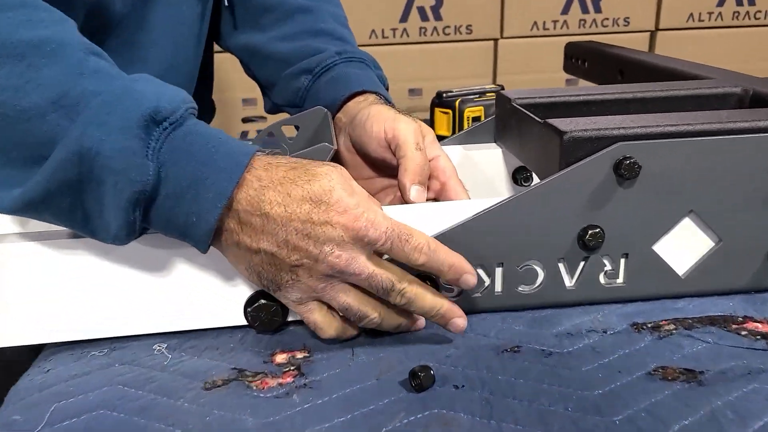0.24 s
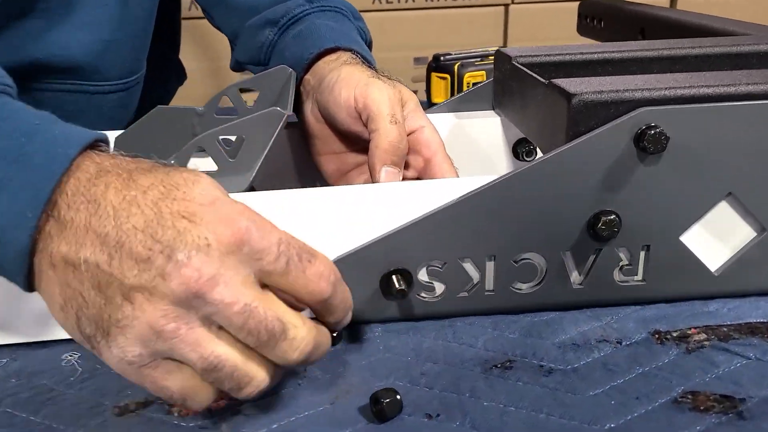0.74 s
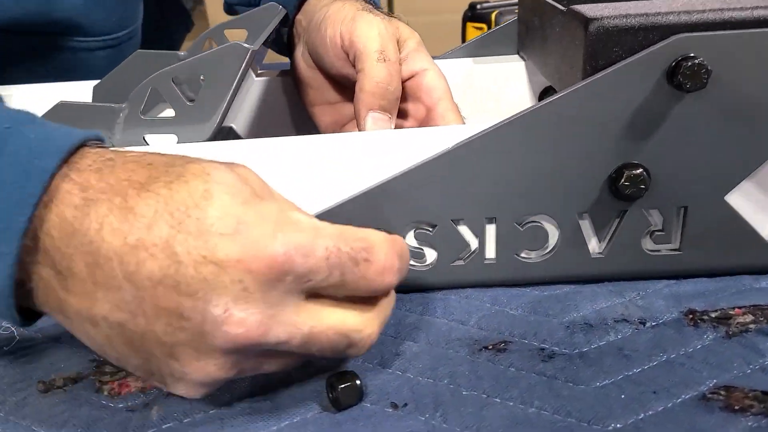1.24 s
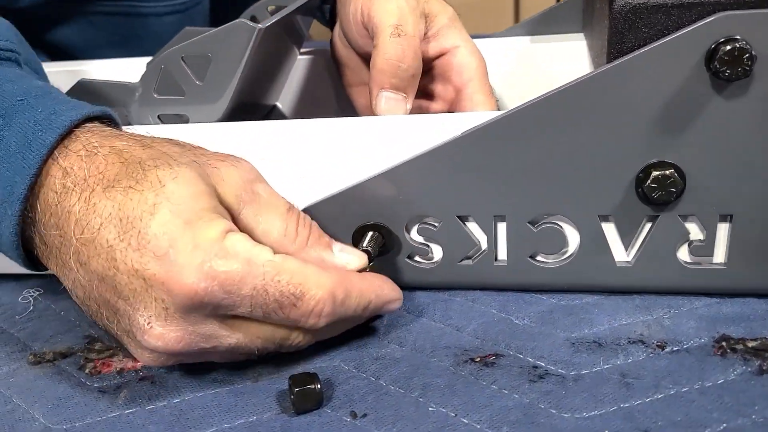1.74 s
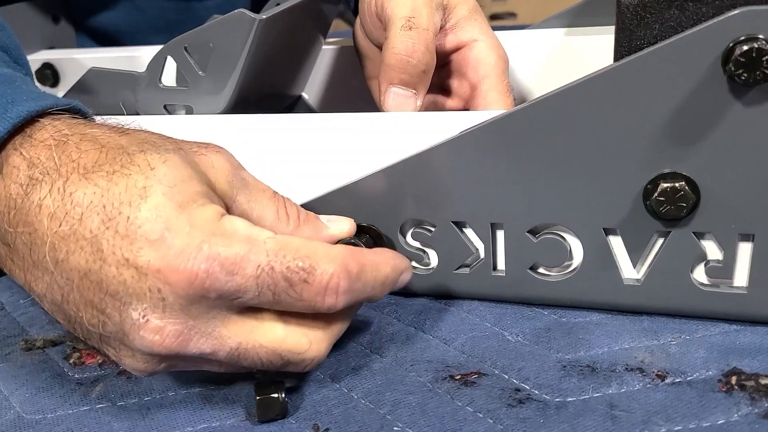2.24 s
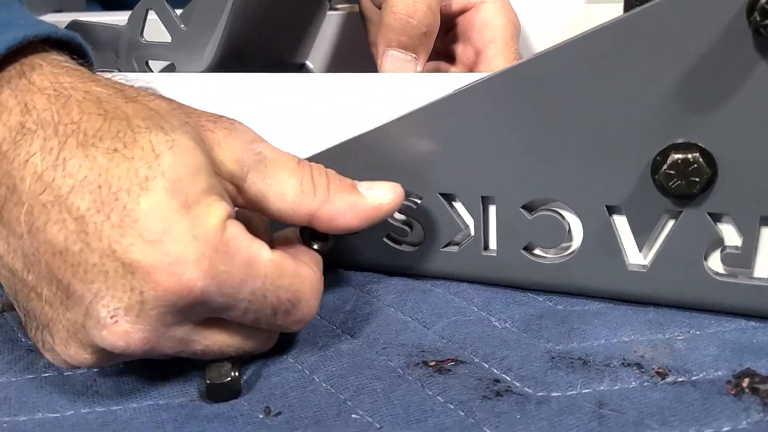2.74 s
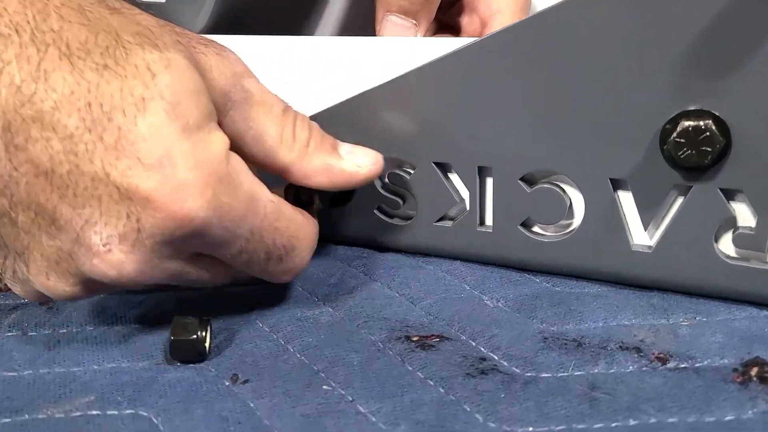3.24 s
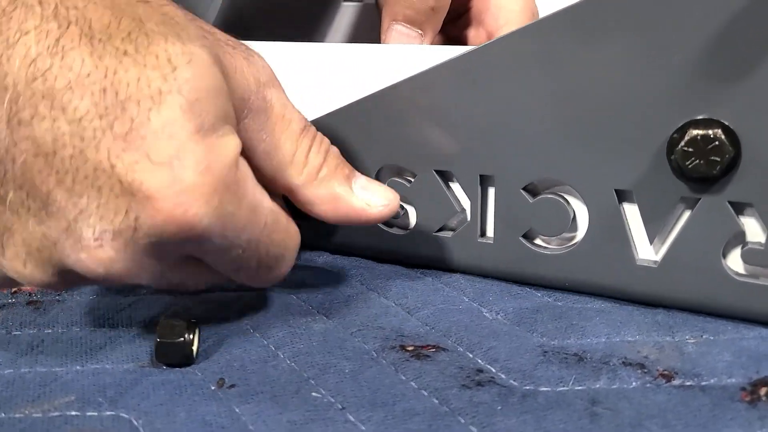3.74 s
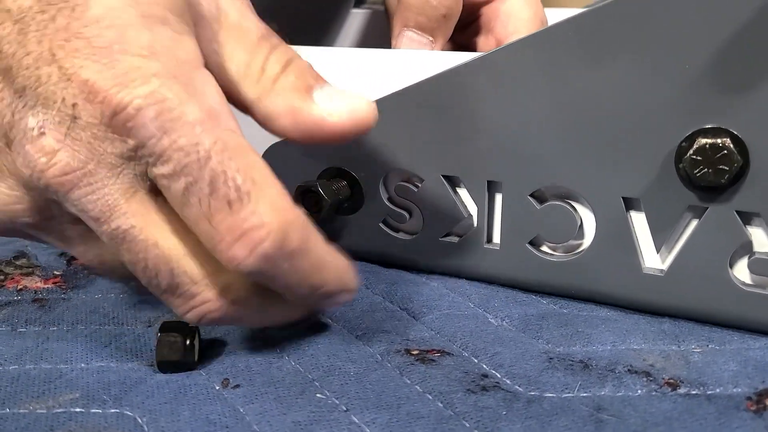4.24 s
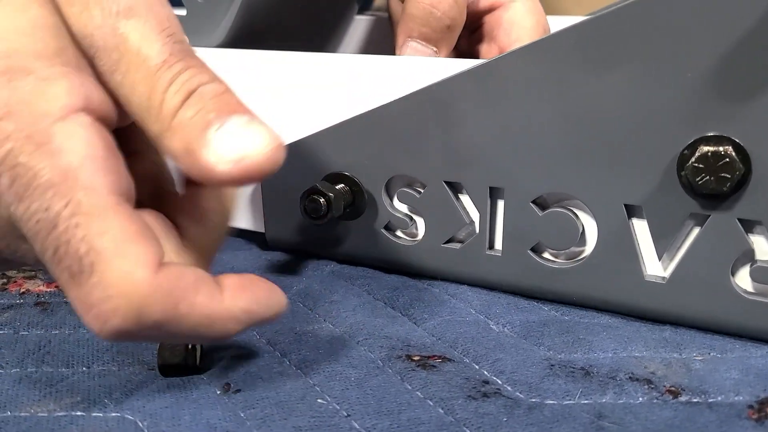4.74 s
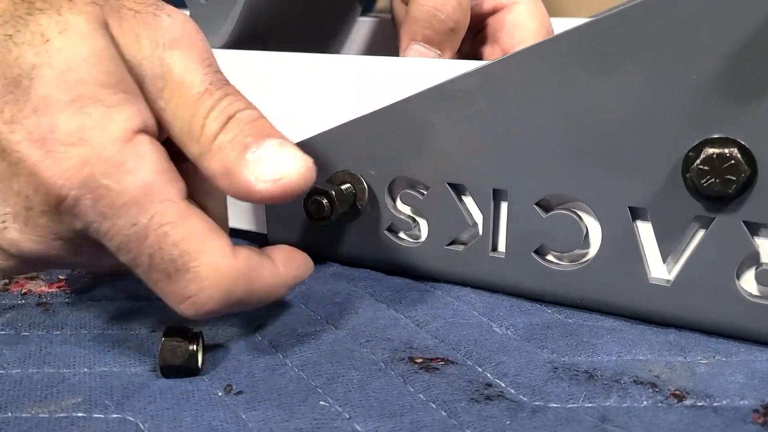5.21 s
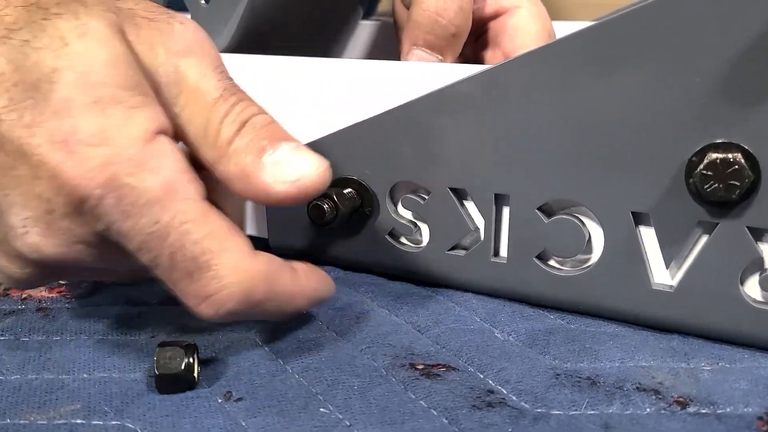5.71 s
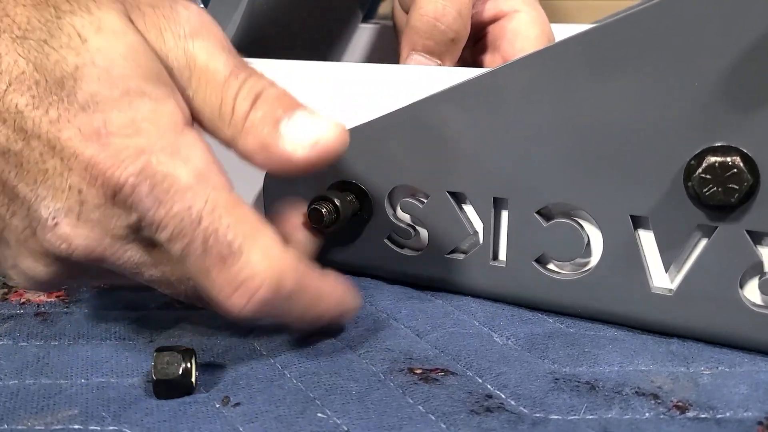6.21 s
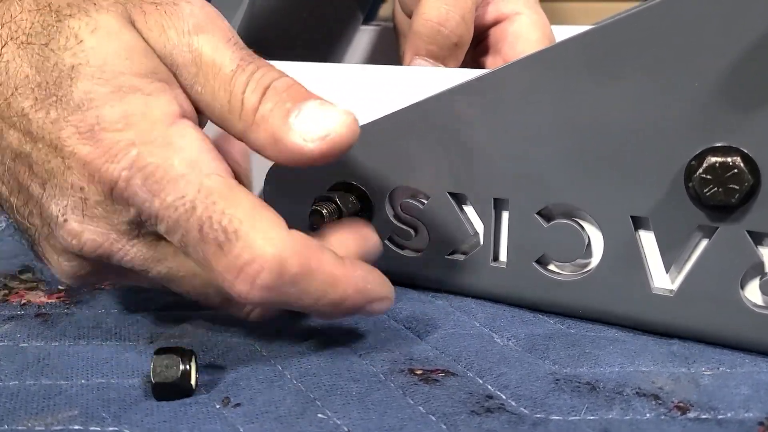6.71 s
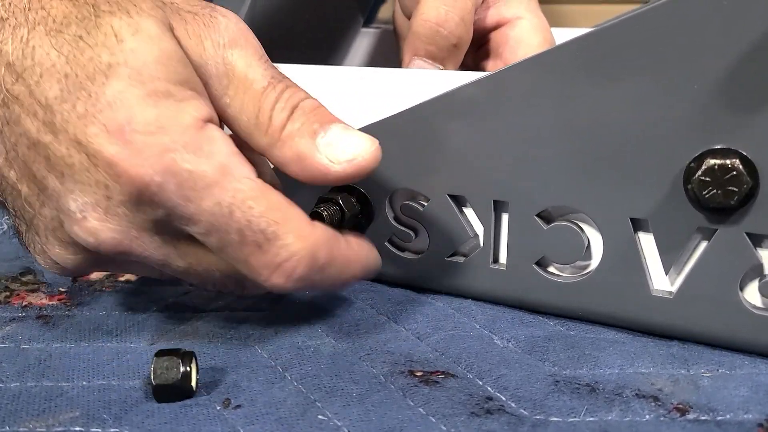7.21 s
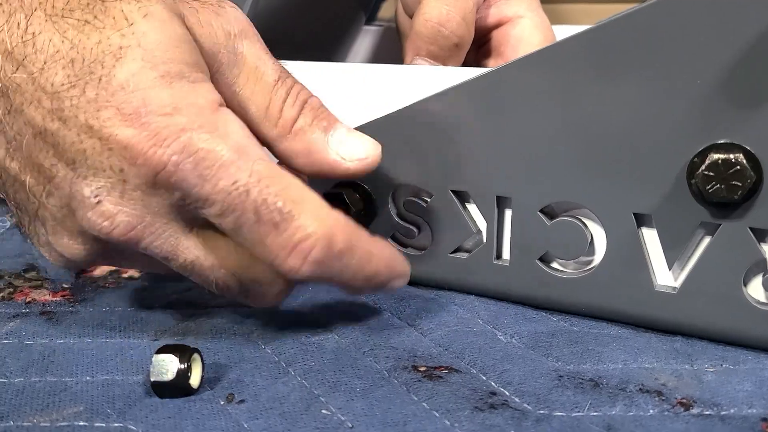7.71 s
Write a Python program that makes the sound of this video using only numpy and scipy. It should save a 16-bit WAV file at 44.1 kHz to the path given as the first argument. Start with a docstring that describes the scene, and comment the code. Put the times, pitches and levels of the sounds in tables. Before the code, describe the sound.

A quiet workshop with soft low ventilation rumble, faint mains hum and a trace of hiss, captured very close in stereo. From 0 to 0.7 s a washer slips over a steel bolt: small clinks, a bright one at 0.2 s with a thin high ping, a double clack at 0.4 s, a light slide around 0.6 s. Then near quiet, with a faint tap at 1.55 s. At 1.8 s the nut meets the thread with sharp clacks, then faint ticks and scrapes to 2.6 s. Looser strokes come at 2.9-4 s, with a dry snap at 3.4 s. From 4.3 to 7.1 s regular flicks, roughly every quarter second, each tick, brief swelling thread rattle and hard clack with a small bracket thump, strongest around 6-6.8 s. Washer pings ring at 5.2, 5.3 and 7.0 s. Softer strokes and dull hand bumps finish by 8 s, with short room reverberation.

```python
"""In a quiet workshop with a low mains hum, a washer is slipped over a bolt in a steel bracket,
then a nut is started and flicked along the thread with a finger, close to a two-port microphone.
Each flick is a tick, a swelling rattle of thread on thread and a clack as the nut stops; the loose washer pings.
Noise bursts stand for the contacts and ring the filters of bolt and bracket; pings and thumps are fading sines.
The air is shaped noise, and the room answers with fading noise."""
import sys
import numpy as np
from scipy import signal
from scipy.fft import rfft, irfft, next_fast_len
from scipy.io import wavfile
from scipy.ndimage import map_coordinates

SR = 44100
rng = np.random.default_rng(int(sys.argv[2]) if len(sys.argv) > 2 else 0)


def output_pcm(signal):
    """Save a mono or channel-first signal as 16-bit PCM at the path in sys.argv[1].

    Samples are clipped to [-1, 1] before scaling.
    """
    pcm = np.clip(np.atleast_2d(signal).T, -1, 1) * 32767
    wavfile.write(sys.argv[1], SR, np.round(pcm).astype(np.int16))


N = 350815  # length in samples


def amp(db):
    """Turn decibels into a gain."""
    return 10 ** (np.asarray(db) / 20)


def unit(x):
    """Scale to an average (rms) level of 1."""
    return x / np.sqrt(np.mean(x ** 2) + 1e-20)


def along(points, hz):
    """Read a curve of (Hz, value) points, with the frequencies spaced as the ear hears them (log)."""
    f, v = np.transpose(points)
    return np.interp(np.log(hz + 1), np.log(f + 1), v)


def grid():
    """Frequencies of a transform over the whole length plus a second of padding."""
    return np.fft.rfftfreq(2 * next_fast_len((N + SR) // 2), 1 / SR)


def filtered(x, response):
    """Pass x through a frequency response given on the grid."""
    size = 2 * (response.shape[-1] - 1)
    return irfft(rfft(x, size) * response, size)[..., :N]


def causal(gain):
    """Give a gain curve the timing of a real object: no sound before the blow (minimum phase)."""
    cepstrum = irfft(np.log(np.maximum(gain, 1e-6)))
    half = len(cepstrum) // 2
    cepstrum[1:half] *= 2
    cepstrum[half + 1:] = 0
    return np.exp(rfft(cepstrum))


def above(hz, edge_hz, order=6):
    """A smooth step from 0 to 1 at the edge frequency."""
    return 1 - 1 / (1 + (hz / edge_hz) ** order)


def add(track, s, sound):
    """Mix a sound into a track at s seconds."""
    start = max(round(s * SR), 0)
    part = track[..., start:start + sound.shape[-1]]
    part += sound[..., :part.shape[-1]]


def wobble(rate, size):
    """A smooth random curve of size samples, through rate random points a second."""
    knots = np.arange(size) * rate / SR
    return map_coordinates(rng.standard_normal(400), [knots], mode="wrap")


# Colour of the air noise. Each row: frequency in Hz, relative strength in dB per Hz.
AIR_COLOUR = [(15, -31.5), (30, -9.5), (77, -11), (216, -22.5), (400, -22), (600, -27), (1000, -31),
              (1500, -35), (3000, -33), (4200, -39.5), (5000, -44.5), (7000, -47.5), (10000, -56.5),
              (16000, -53.5)]
# How alike the air noise is in both ears. Each row: frequency in Hz, likeness from 0 to 1.
AIR_ALIKE = [(60, 0.94), (300, 0.84), (800, 0.26), (2000, 0), (10000, 0)]
# Steady tones, hum and whine. Each row: frequency in Hz before the waver, rms level in dB before the lean.
HUM_TONES = [(59.3, -60.5), (118.6, -69), (177, -77), (4107, -83)]
AIR_DB = -58.5  # rms level of the air noise before its drift and lean


def background():
    """Ventilation rumble and faint hiss as shaped noise, with a wavering hum and a thin whine as sines."""
    hz, t = grid(), np.arange(N) / SR
    # mixing a shared and an opposed noise by this angle sets the likeness
    turn = np.arccos(np.clip(along(AIR_ALIKE, hz), -1, 1)) / 2
    shares = np.array([np.cos(turn), np.sin(turn)])
    mid, side = filtered(rng.standard_normal((2, N)), amp(along(AIR_COLOUR, hz)) * shares)
    drift_db = 0.9 * wobble(3, N)
    air = amp(AIR_DB + drift_db) * unit(np.array([mid + side, mid - side]))
    waver = 0.52 * wobble(2.4, N)  # phase in radians
    hum = sum(np.sqrt(2) * amp(db) * np.sin(2 * np.pi * f * t + waver) for f, db in HUM_TONES)
    return (air + hum) * amp([[-0.5], [0.5]])  # leans to the right


def taps(rows, chatter_t60, rise, first_db, lead_in_db):
    """Force of a tap (knock, body, edge): faint, soft noise around one sharp blow, and a dying chatter."""
    force = np.zeros((3, N))
    t = np.arange(-SR // 100, SR // 12) / SR
    after = np.maximum(t, 0)
    chatter = amp(-60 * after / chatter_t60) * (1 - np.exp(-after / rise))
    shape = chatter + amp(lead_in_db) * np.exp(-np.abs(t) / 0.0049)
    for s, db, knock_db, bright_db in rows:
        blow = rng.standard_normal(len(t)) * shape
        blow[np.searchsorted(t, 0.0015)] += amp(first_db)
        add(force, s + t[0], amp([[db + knock_db], [db], [db + bright_db]]) * blow)
    return force


def rubs(rows, slips_per_s, spread_db, release, bright_db, hiss, uneven_db):
    """Force of sliding (knock, body, edge): dense uneven slips, under a pressure that comes and goes."""
    force = np.zeros((3, N))
    t = np.arange(SR // 3) / SR
    for start, end, start_db, end_db, knock_db in rows:
        happens = rng.random(len(t)) < slips_per_s / SR
        slips = happens * amp(spread_db * rng.standard_normal(len(t)))
        slips = unit(slips * np.sign(rng.standard_normal(len(t))))
        grain = unit(slips + hiss * rng.standard_normal(len(t)))
        length = max(end - start, 0.005)
        pressure_db = np.interp(t, [0, length], [start_db, end_db])
        pressure = amp(pressure_db + uneven_db * wobble(131.0, len(t)))
        pressure *= (1 - np.exp(-t / 0.00085)) * np.exp(-np.maximum(t - length, 0) / release)
        add(force, start, amp([[knock_db], [0], [bright_db]]) * grain * pressure)
    return force


def resonances(modes, broad, damping):
    """Ringing notes standing on a broad spectrum, at average power 1; more damping widens the notes."""
    hz = grid()
    power = amp(along(broad, hz)) ** 2
    for centre, width, db in modes:
        power += amp(db) ** 2 / damping / (1 + (2 * (hz - centre) / (width * damping)) ** 2)
    return causal(np.sqrt(power / np.mean(power)))


# Notes of the steel bracket. Each row: frequency in Hz, width in Hz, relative level in dB.
BRACKET_MODES = [(378, 36, -4), (450, 60, -9), (532, 51, 0), (625, 59, -3), (740, 60, -10), (1100, 82, -11)]


def steel(force, modes, crack, thud, edge, damping, knock_db, edge_db):
    """The force rings the bolt; its knock part shakes the bracket, and its edge part adds bright treble."""
    hz = grid()
    low_band = above(hz, 297, order=12) * (1 - above(hz, 2370))
    bracket = resonances(BRACKET_MODES, thud, damping=1.0) * causal(low_band)
    bolt = resonances(modes, crack, damping)
    body = bolt * causal(above(hz, 1625) * (1 - above(hz, 10870, order=10)))
    sparkle = bolt * causal(amp(edge_db + along(edge, hz)))
    return filtered(force, np.array([amp(knock_db) * bracket, body, sparkle])).sum(axis=0)


# The washer meets the bolt. Each row: start in seconds, relative level in dB,
# brightness in dB compared with that level.
WASHER_TAPS = [(0.0074, -28.5, -17), (0.0656, -35, -6), (0.123, -39, -21), (0.2143, -22, 6),
               (0.371, -36, -27), (0.3995, -25.5, -9), (0.4038, -18, 2.5), (0.6146, -39, -20),
               (0.679, -31.5, -4.5), (0.895, -48.5, -5), (1.3376, -51, -13), (1.5491, -31, -20),
               (1.581, -46.5, -24), (3.9817, -43, 4), (5.1706, -36, 3), (5.2767, -46.5, 5),
               (5.3371, -44, 12), (5.4391, -43.5, 9), (7.0409, -36.5, 4)]
# The washer slides on the shank. Each row: start in seconds, length in seconds, relative level in dB.
WASHER_SLIDES = [(0.005, 0.031, -42), (0.557, 0.22, -46)]
# Notes of the bolt with the washer alone. Each row: frequency in Hz, width in Hz before the damping
# factor, relative level in dB before that factor.
BARE_BOLT_MODES = [(1936, 230, -0.5), (2510, 42, -4), (2720, 130, -9.5), (3180, 72, -9), (3655, 146, -1.5),
                   (3930, 50, -6), (5000, 64, -19.5), (5700, 74, -12), (7700, 51, -15), (8600, 42, -26)]
# Broad part of the washer's contacts. Each row: frequency in Hz, relative strength in dB per Hz.
WASHER_CRACK = [(1300, -52), (2000, -14), (3200, -6.5), (5800, -17), (6800, -30.5), (9000, -30.5),
                (12500, -30.5), (15500, -32)]
# The bracket under the washer. Each row: frequency in Hz, relative strength in dB per Hz.
WASHER_THUD = [(200, -25), (400, -1), (750, -1.5), (1150, 2), (1400, 4), (1900, 10), (3000, -34)]
# Extra treble of a hard washer contact. Each row: frequency in Hz, relative gain in dB.
WASHER_EDGE = [(4000, -17.5), (6500, -1), (8500, 4), (11000, 2), (13000, -0.5), (16000, -14)]
SLIDE_FADE_DB = 1.5  # fade along a slide
SLIDE_KNOCK_DB, WASHER_KNOCK_DB = -23.5, -19.5  # knock force, compared with the slide or tap


def washer():
    """The washer clacks against the bolt and slides along it, ringing bolt and bracket."""
    blows = [(s, db, WASHER_KNOCK_DB, bright_db) for s, db, bright_db in WASHER_TAPS]
    slides = [(s, s + length, db, db - SLIDE_FADE_DB, SLIDE_KNOCK_DB) for s, length, db in WASHER_SLIDES]
    force = amp(5.5) * taps(blows, chatter_t60=0.017, rise=0.0017, first_db=6.0, lead_in_db=-19)
    force += amp(-2) * rubs(slides, slips_per_s=600, spread_db=2.5, release=0.012,
                            bright_db=-25.0, hiss=0.48, uneven_db=5.5)
    return steel(force, BARE_BOLT_MODES, WASHER_CRACK, WASHER_THUD, WASHER_EDGE,
                 damping=0.8, knock_db=6.5, edge_db=7.0)


# The washer swings free and rings. Each row: start in seconds, relative level in dB.
PINGS = [(0.216, -44), (0.407, -61), (0.682, -48.5), (3.219, -65), (5.186, -46), (5.341, -47),
         (7.044, -42.5), (7.62, -71)]
# Notes in each ping. Each row: frequency in Hz, relative level in dB, time to fade by 60 dB in seconds.
PING_MODES = [(9700, -27, .2), (10880, -39, 0.22), (12940, 2.5, 0.34)]


def pings():
    """The thin, high ring of the loose washer: a few fading sines with a soft start."""
    track, t = np.zeros(N), np.arange(SR // 2) / SR
    for s, db in PINGS:
        ring = sum(amp(level - 60 * t / t60) * np.sin(2 * np.pi * hz * t) for hz, level, t60 in PING_MODES)
        add(track, s, amp(db) * ring * (1 - np.exp(-t / 0.0013)))
    return track


def note(hz, db, t60, rise):
    """One struck note: a sine that rises quickly and dies away."""
    t = np.arange(SR // 2) / SR
    return amp(db - 60 * t / t60) * np.sin(2 * np.pi * hz * t) * (1 - np.exp(-t / rise))


# A light touch leaves one note of the washer ringing. Each row: start in seconds, frequency in Hz,
# level in dB before the soft start, time to fade by 60 dB in seconds.
CHIMES = [(0.371, 2390, -36, 0.047), (0.406, 2120, -31.5, 0.031), (1.549, 1990, -51, .14),
          (2.067, 2670, -56, 0.37), (2.621, 2700, -53, 0.13)]


def chimes():
    """Faint single notes of the loosely held washer, one fading sine each."""
    track = np.zeros(N)
    for s, hz, db, t60 in CHIMES:
        add(track, s, note(hz, db, t60, rise=0.00069))
    return track


FIRM_DB = -24.5  # level of a firm contact, from which the two laws below count
TAP_KNOCK_DB, RUB_KNOCK_DB = -12.5, -19  # knock force of a firm tap and rub, compared with its level
KNOCK_SLOPE = 0.48  # dB of knock gained, compared with the level, for each dB softer
TICK_BRIGHT_DB, CLACK_BRIGHT_DB = -23.5, -19  # treble force of a firm tick and clack, likewise
BRIGHT_SLOPE = 1.19  # dB of treble gained, compared with the level, for each dB harder


def knock(db, firm_knock_db):
    """Bracket share of a contact in dB: a soft touch holds more knock."""
    return firm_knock_db - KNOCK_SLOPE * (db - FIRM_DB)


def brightness(db, firm_bright_db):
    """Treble share of a contact in dB: the harder, the brighter."""
    return firm_bright_db + BRIGHT_SLOPE * (db - FIRM_DB)


def contact(s, db):
    """One tick of the nut against the thread, as a row for taps."""
    return s, db, knock(db, TAP_KNOCK_DB), brightness(db, TICK_BRIGHT_DB)


def run_on_thread(start, end, start_db, end_db):
    """One stretch of thread rubbing on thread, as a row for rubs."""
    return start, end, start_db, end_db, knock((start_db + end_db) / 2, RUB_KNOCK_DB)


# The bracket's thump note rises as the nut runs in. Each row: time in seconds, frequency in Hz.
THUMP_HZ = [(5.5, 377), (6.0, 520)]
THUMP_RING_DB = -5.5  # the note compared with the thump's level


def thump(s, db):
    """The low note of the bracket under a clack, a short fading sine."""
    hz = np.interp(s, *np.transpose(THUMP_HZ))
    return note(hz, db + THUMP_RING_DB, t60=0.047, rise=0.0015)


# A finger drives the nut. Each row: landing in seconds, run up to the clack in seconds, coasting after it
# in seconds, then the relative levels in dB of tick, rattle, clack and thump on the bracket.
STROKES = [(1.7831, 0.038, .004, -24, -32, -19.5, -35), (2.9359, 0.024, .003, -32.5, -53, -26, -51),
           (3.1741, 0.1, 0.044, -29.5, -48, -32.5, -37.5), (3.6, 0.13, 0.028, -46.5, -43.5, -34, -44),
           (3.9814, 0.12, 0.013, -28.5, -39, -43, -38), (4.337, 0.072, 0.034, -29, -33, -22, -29.5),
           (4.632, 0.049, 0.013, -29.5, -30, -17.5, -24.5), (4.9074, 0.055, 0.0096, -24, -40.5, -29.5, -59),
           (5.1707, .024, 0.026, -24, -40, -23, -60), (5.4385, .0463, 0.008, -28, -33.5, -20, -33),
           (5.7015, 0.048, .012, -24, -31, -21, -30), (5.9644, 0.037, 0.0078, -26.5, -34, -18, -23.5),
           (6.2211, .0467, .007, -27, -30.5, -16.5, -21.5), (6.4915, 0.04, .009, -24, -30, -16, -28),
           (6.76, .0459, 0.0046, -27.5, -41.5, -19, -25.5), (7.0402, 0.02, 0.042, -25, -31, -22.5, -35),
           (7.268, 0.048, .02, -37, -40, -32, -64), (7.5566, 0.06, 0.021, -51, -50.5, -35, -31.5),
           (7.9012, 0.022, .03, -38, -41, -35, -37.5)]
# The nut catches or knocks in its play. Each row: start in seconds, relative level in dB.
NUT_KNOCKS = [(1.7941, -16.5), (2.0634, -33), (2.2191, -32.5), (2.3496, -51.5), (2.4414, -45.5),
              (2.6179, -42.5), (3.5513, -60), (4.3706, -19), (4.6578, -20), (5.623, -45), (6.152, -42),
              (6.5198, -21), (7.1514, -48), (7.864, -49)]
# The nut is eased round to find the thread. Each row: start in seconds, length in seconds,
# relative level in dB at the end.
FEELING = [(2.081, 0.181, -60.5), (2.61, 0.2, -61.5)]
# The hand bumps the bracket, dull and without a click. Each row: start in seconds, relative level in dB.
BUMPS = [(1.015, -49), (3.9809, -38), (4.338, -37), (6.1528, -39.5), (7.5572, -41.5), (7.5972, -36),
         (7.7546, -50), (7.8361, -52)]
# Notes of the bolt with the nut on it. Each row: frequency in Hz, width in Hz, relative level in dB.
BOLT_MODES = [(1500, 44, -17), (2090, 42, -22), (2400, 43, -17), (2546, 40, -14), (2739, 38, -5),
              (2974, 62, -1), (3085, 67, -1), (3300, 72, -6), (3597, 44, -4), (3775, 62, 0),
              (4118, 41, -17), (4240, 37, -13), (4940, 107, -2), (5318, 42, -19), (5507, 44, -9),
              (5820, 69, -5), (6594, 51, -14), (7008, 76, -6), (7960, 63, -14), (8310, 56, -19),
              (9590, 39, -17), (10070, 65, -16), (10600, 101, -20)]
# Broad part of the nut's contacts. Each row: frequency in Hz, relative strength in dB per Hz.
NUT_CRACK = [(1300, -16), (2000, -11.5), (3200, -5), (4500, -8.5), (6000, -13), (7500, -21.5),
             (11000, -44.5), (12500, -31), (15500, -30)]
# The bracket under the nut. Each row: frequency in Hz, relative strength in dB per Hz.
NUT_THUD = [(200, -38), (320, -10), (680, -4.5), (900, -17.5), (1100, -7), (1330, -15), (1550, -9),
            (1900, -8.5), (3000, -26.5)]
# Extra treble of a hard nut contact. Each row: frequency in Hz, relative gain in dB.
NUT_EDGE = [(4000, -15), (7000, 0), (9000, -0.5), (11000, 3), (13000, -11), (14500, -21.5), (16000, -23)]
GRIP_SHARE = 0.22  # the rattle starts this far into the run
SWELL_DB_PER_S, COAST_FADE_DB = 148, 8.5  # it swells up to the clack, then fades while coasting
FEEL_SWELL_DB = 5.5  # each try to find the thread grows by this much
BUMP_BOLT_DB, BUMP_BRIGHT_DB = -10.5, -30  # share of a bump reaching the bolt; treble against that share


def nut():
    """Each stroke is a tick, a swelling rattle, a clack that thumps the bracket, and a short coast."""
    blows = [contact(s, db) for s, db in NUT_KNOCKS]
    # the bracket gets the full bump, the bolt only its share
    blows += [(s, db + BUMP_BOLT_DB, -BUMP_BOLT_DB, BUMP_BRIGHT_DB) for s, db in BUMPS]
    runs = [run_on_thread(s, s + length, db - FEEL_SWELL_DB, db) for s, length, db in FEELING]
    thumps = np.zeros(N)
    for s, run, coast, tick_db, rattle_db, clack_db, thump_db in STROKES:
        grip, stop = s + GRIP_SHARE * run, s + run
        clack = (stop, clack_db, thump_db - clack_db, brightness(clack_db, CLACK_BRIGHT_DB))
        blows += [contact(s, tick_db), clack]
        swell_db = SWELL_DB_PER_S * (stop - grip)
        runs.append(run_on_thread(grip, stop, rattle_db - swell_db, rattle_db))
        runs.append(run_on_thread(stop, stop + coast, rattle_db, rattle_db - COAST_FADE_DB))
        add(thumps, stop, thump(stop, thump_db))
    force = amp(-0.5) * taps(blows, chatter_t60=0.013, rise=0.00071, first_db=4.5, lead_in_db=-20.5)
    force += amp(-1.5) * rubs(runs, slips_per_s=900, spread_db=3.0, release=0.004,
                              bright_db=-35.5, hiss=0.38, uneven_db=2.5)
    return thumps + steel(force, BOLT_MODES, NUT_CRACK, NUT_THUD, NUT_EDGE,
                          damping=1.0, knock_db=1, edge_db=18.5)


# Small dry snaps of the fingers' grip. Each row: start in seconds, level in dB before the colour below.
SNAPS = [(3.077, -48), (3.365, -38), (3.3952, -19.5)]
# Colour of a snap. Each row: frequency in Hz, gain in dB.
SNAP_COLOUR = [(100, -32), (400, 8), (1500, 6.5), (4000, 5.5), (8000, 3), (15000, -46)]


def snaps():
    """Single filtered clicks, without the ring of the steel."""
    track = np.zeros(N)
    for s, db in SNAPS:
        track[round(s * SR)] = amp(db)
    return filtered(track, causal(amp(along(SNAP_COLOUR, grid()))))


def ports(x, lead_ms, bass_edge_hz):
    """The treble reaches the left port first; the bass is alike in both."""
    hz = grid()
    turn = np.pi * hz * lead_ms / 1000 * above(hz, bass_edge_hz)  # half the lead for each port
    return filtered(x, np.exp(1j * np.array([turn, -turn])))


# How long the room rings. Each row: frequency in Hz, time to fade by 60 dB in seconds.
ROOM_T60 = [(300, 0.3), (1000, 0.35), (3000, 0.54), (6000, 0.44), (10000, 0.24), (15000, 0.18)]
# Colour of the room's answer. Each row: frequency in Hz, relative gain in dB.
ROOM_SEND = [(300, -3.5), (800, 7), (1400, 4.5), (2200, 9.5), (3100, 2.5), (4300, 0), (6000, -5),
             (10000, 4)]


def workshop(x, near_db, near_t60, room_db):
    """Quick reflections off bracket and hand, then the room's tail: fading noise, redrawn every 1/4 second."""
    wet, block = np.zeros((2, N)), SR // 4
    for start in range(0, N, block):
        hz, t, z = signal.stft(rng.standard_normal((2, SR // 2)), SR, nperseg=256)
        apart = above(hz, 1000, order=3)[:, None]  # the two ports share only the bass
        z = np.array([z[0], np.sqrt(1 - apart) * z[0] + np.sqrt(apart) * z[1]])
        near = signal.istft(z * amp(-60 * t / near_t60), SR, nperseg=256)[1]
        far_db = along(ROOM_SEND, hz)[:, None] - 60 * t / along(ROOM_T60, hz)[:, None]
        far = signal.istft(z * amp(far_db), SR, nperseg=256)[1]
        answer = amp(near_db) * near / np.linalg.norm(near[0])
        answer += amp(room_db) * far / np.linalg.norm(far[0])
        echoes = signal.fftconvolve(x[None, start:start + block], answer, axes=1)
        add(wet, start / SR + 0.001512, echoes)
    return wet


# Balance of the close sounds and their echoes. Each row: frequency in Hz, left minus right in dB.
BALANCE_DB = [(400, -3), (1200, -2.5), (2400, 0.5), (3400, 1), (4400, -6.5), (8000, 0), (14000, -8)]


def scene():
    """Washer and nut close by, balanced left to right by pitch, with the workshop around them."""
    parts = washer() + chimes() + nut()
    near = ports(parts + pings() + snaps(), lead_ms=0.3298, bass_edge_hz=1080)
    heard = near + workshop(parts, near_db=-2.0, near_t60=0.048, room_db=-13.5)
    lean_db = along(BALANCE_DB, grid()) / 2
    return filtered(heard, amp([lean_db, -lean_db])) + background()


def record(dry):
    """A steep filter removes the treble above 15850 Hz."""
    return filtered(dry, 1 - above(grid(), 15850, order=120))


dry = scene()
out = record(dry)
output_pcm(out)
```